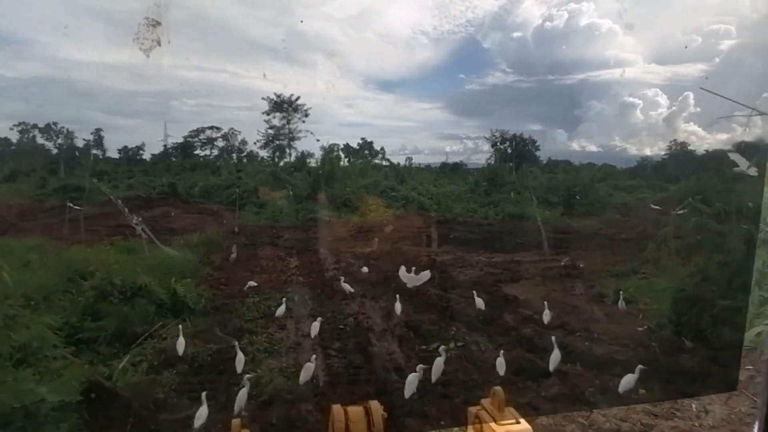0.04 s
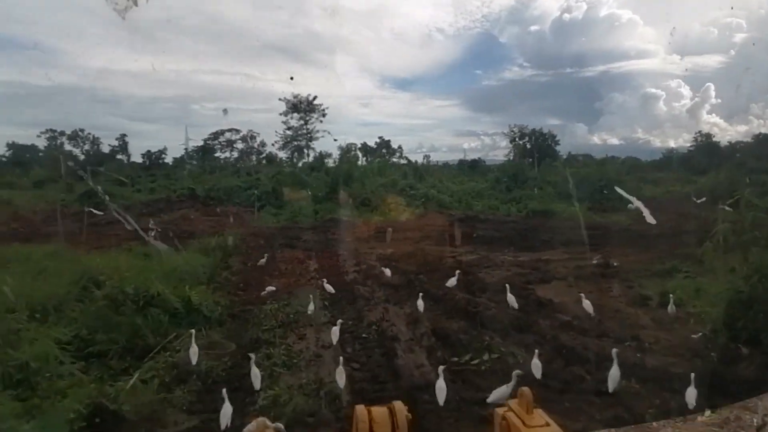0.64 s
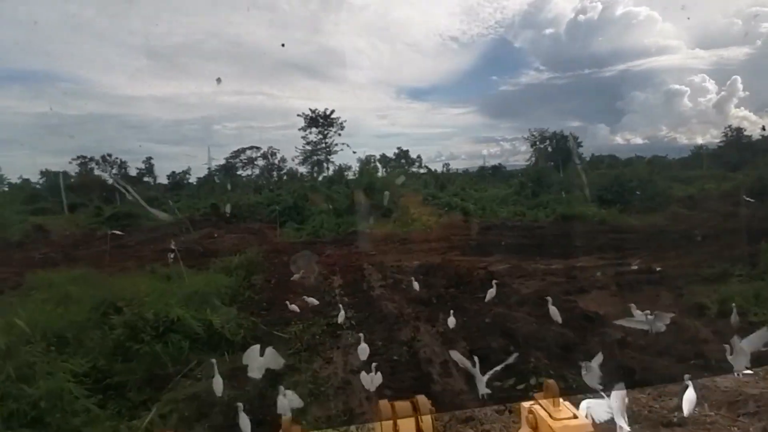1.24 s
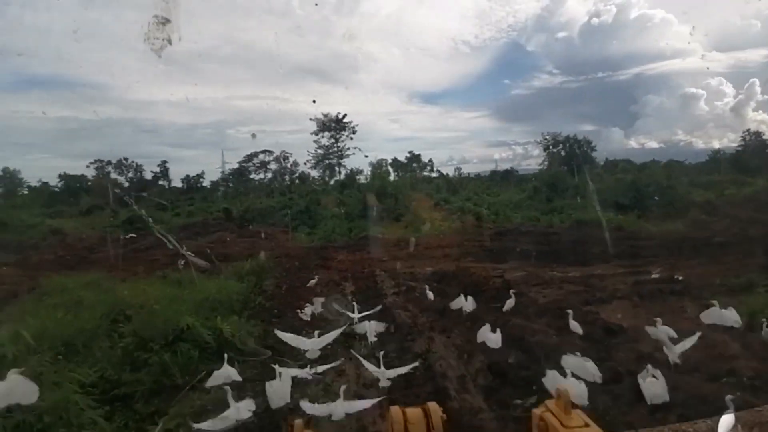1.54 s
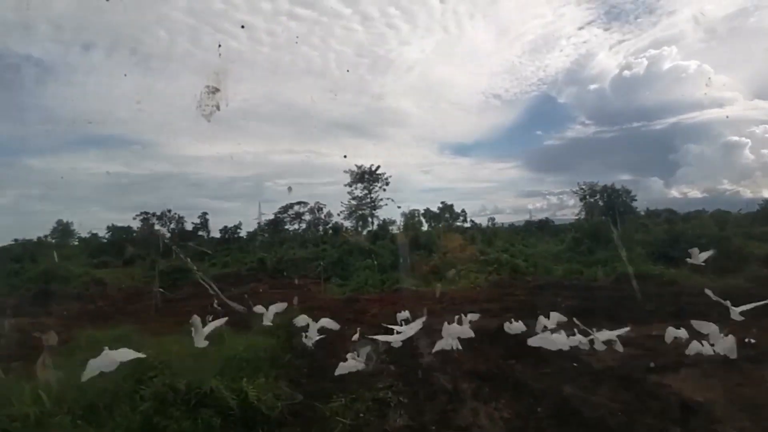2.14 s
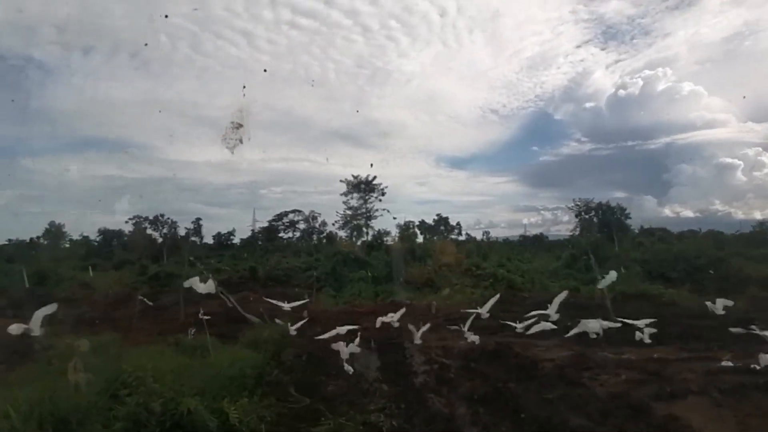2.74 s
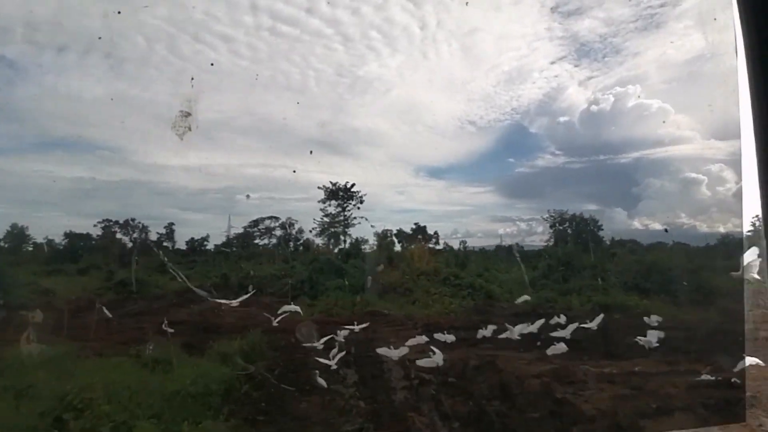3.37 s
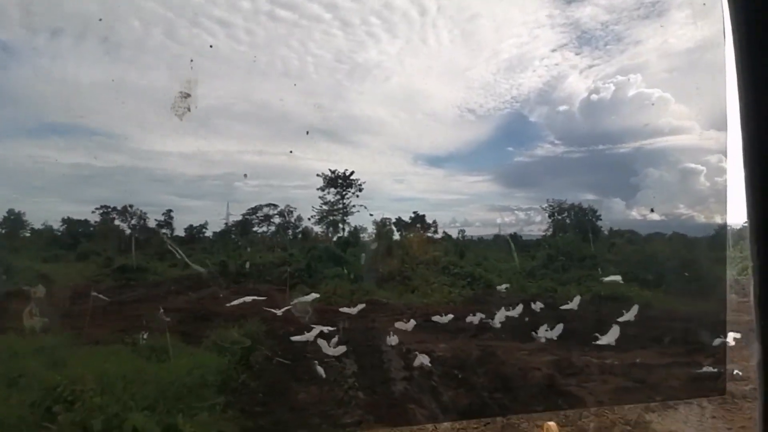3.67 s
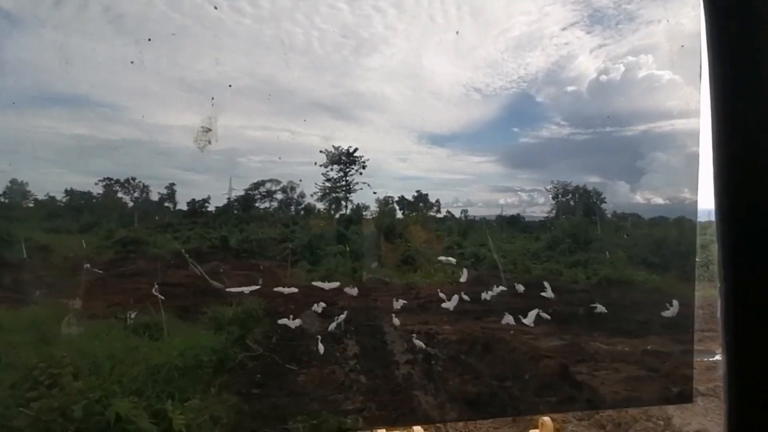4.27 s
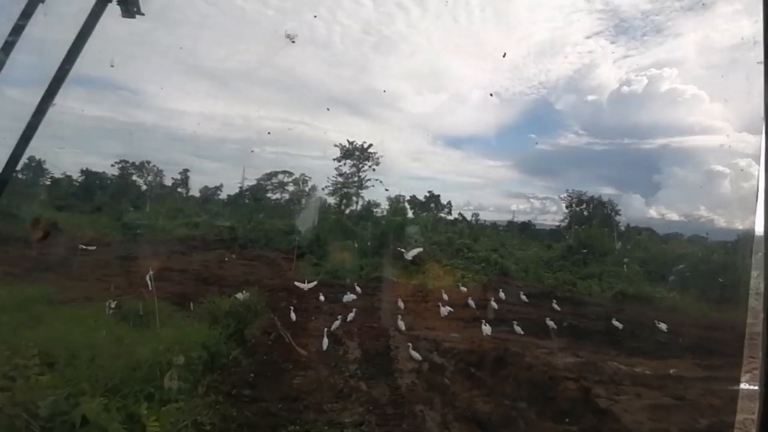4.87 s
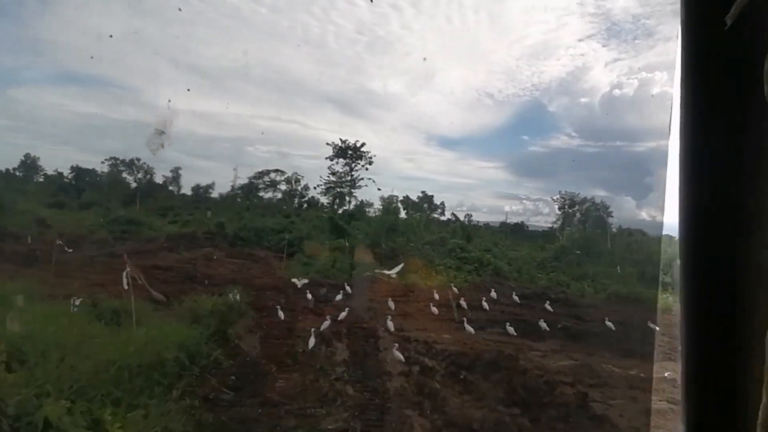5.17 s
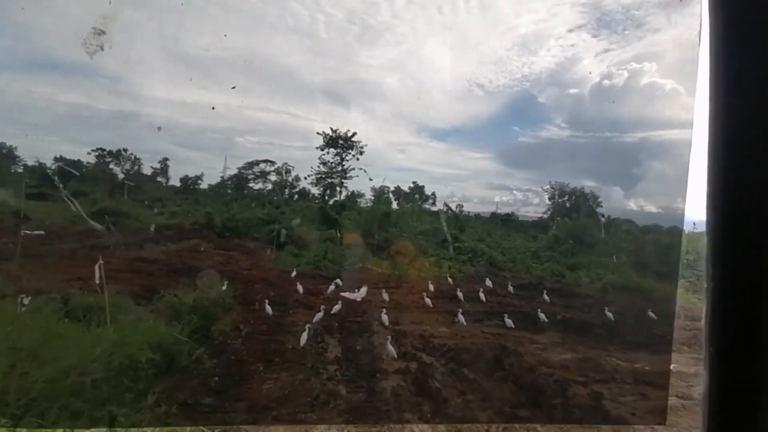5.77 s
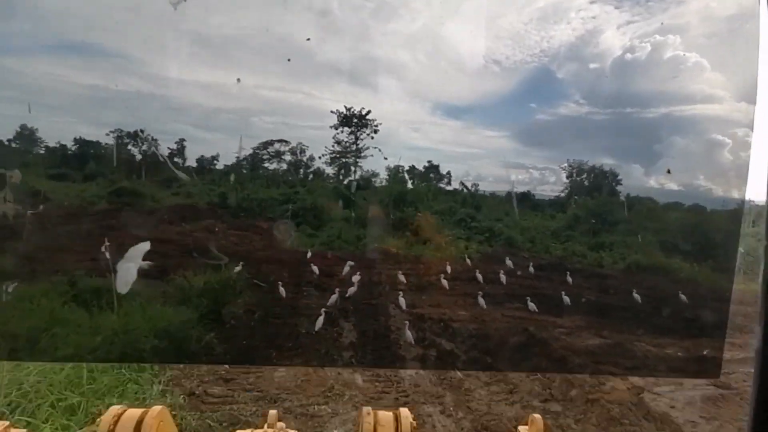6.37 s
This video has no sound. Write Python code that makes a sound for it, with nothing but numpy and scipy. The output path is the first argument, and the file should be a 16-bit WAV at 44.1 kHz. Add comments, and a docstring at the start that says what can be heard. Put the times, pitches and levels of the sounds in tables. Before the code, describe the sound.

A bulldozer's diesel engine booms steadily inside the cab, with rattling panels, a few dull knocks and a sharp squeak late on.

```python
"""A booming diesel din at nearly steady speed: a six-cylinder bulldozer, heard from inside the cab.
Firings throb, the block clatters harder under load, and fan, pump and gears sing over a fine hiss.
Loose panels buzz whenever an engine order meets their resonance; parts of the cab rattle and knock.
Late on, something close by squeaks and scrapes, and a gain control ducks the din."""
import sys
import numpy as np
from scipy.fft import rfft, irfft, next_fast_len
from scipy.io import wavfile
from scipy.ndimage import uniform_filter1d, minimum_filter1d, map_coordinates

SR = 44100
rng = np.random.default_rng(int(sys.argv[2]) if len(sys.argv) > 2 else 0)


def wav_record(signal):
    """Record a signal, one row per channel, as 16-bit PCM in the file named by sys.argv[1]."""
    frames = np.transpose(np.atleast_2d(signal))
    bounded = np.clip(frames, -1, 1)
    # unit amplitude maps onto the largest positive 16-bit level
    quanta = np.round(bounded * 32767).astype(np.int16)
    wavfile.write(sys.argv[1], SR, quanta)


N = 287091

CYLINDERS = 6  # firings per four-stroke cycle; an order is a multiple of the cycle rate
# low din: time_s, throb_db, boom_db
LOW_DIN_LEVELS = [(0, -23.5, -36), (.75, -21.5, -34.5), (1.2, -23, -34.5), (2.3, -23, -30.5),
                  (3.3, -24.5, -34), (5.1, -24, -38), (5.8, -24, -37), (6.5, -25.5, -33.5)]
# gear train: time_s, whine_db, housing_db
GEAR_LEVELS = [(0, -44, -35), (1.1, -44.5, -36), (1.45, -41, -36.5), (2.5, -39, -35.3), (3.1, -45, -39),
               (3.75, -41.5, -38), (4.0, -52, -37.5), (5.1, -57.5, -36.5), (6.5, -57, -40)]


def amp(db):
    """Decibels to gain."""
    return 10 ** (np.asarray(db) / 20)


def unit(x):
    """Scale to rms 1."""
    return x / np.sqrt(np.mean(x ** 2) + 1e-20)


def curves(rows):
    """One value per sample for each column after time_s."""
    time_s, *columns = np.transpose(rows)
    return [np.interp(np.arange(N) / SR, time_s, column) for column in columns]


def wobble(rate_hz):
    """Smooth random curve, rate_hz knots a second."""
    knots = rng.standard_normal(int(N * rate_hz / SR) + 4)
    steps = np.linspace(0, N * rate_hz / SR, N // 32)
    curve = map_coordinates(knots, [steps], mode="mirror")
    return np.interp(np.arange(N) * rate_hz / SR, steps, curve)


def filtered(x, response):
    """Zero-phase filter with gain response(hz)."""
    size = next_fast_len(N + SR // 2)
    return irfft(rfft(x, size) * response(np.fft.rfftfreq(size, 1 / SR)), size)[:N]


def coloured(x, colour):
    """x through a body with (freq_hz, gain_db) points, at rms 1."""
    hz, db = np.transpose(colour)
    response = lambda f: amp(np.interp(np.log(f + 1), np.log(hz), db, left=-60, right=-80))
    return unit(filtered(x, response))


def partial(firings, multiple, waver_db, drift_rad):
    """Slightly unsteady sine at a multiple of the firing rate, at rms 1."""
    phase = 2 * np.pi * (multiple * firings + rng.random()) + drift_rad * wobble(9)
    return unit(amp(waver_db * wobble(12)) * np.sin(phase))


def blows(firings, decay_firings, uneven_db, scatter_db):
    """Envelope of one dying blow per firing; each cylinder has its own strength."""
    index = firings.astype(int)
    cylinder_db = uneven_db * unit(rng.standard_normal(CYLINDERS))[index % CYLINDERS]
    strength_db = cylinder_db + scatter_db * rng.standard_normal(1024)[index]
    return unit(amp(strength_db) * np.exp(-(firings % 1) / decay_firings))


def pulsed_noise(firings, envelope, pulsed, repeat):
    """Noise with one share of its power pulsed by envelope and one repeating every cycle."""
    pattern = rng.standard_normal(4096)
    cycle = map_coordinates(pattern, [firings / CYLINDERS % 1 * len(pattern)], mode="grid-wrap")
    noise = np.sqrt(repeat) * unit(cycle) + np.sqrt(1 - repeat) * rng.standard_normal(N)
    return noise * np.sqrt(1 - pulsed + pulsed * envelope ** 2)


def band(centre_hz, width_hz):
    """Noise in one resonance, at rms 1."""
    response = lambda hz: 1 / (1 + ((hz - centre_hz) / (.7 * width_hz)) ** 4)
    return unit(filtered(rng.standard_normal(N), response))


def swell(start_s, length_s):
    """Half-sine envelope."""
    return np.sin(np.pi * np.clip((np.arange(N) / SR - start_s) / length_s, 0, 1))


def stroke(t, length_s, ramp_s, fade_db):
    """Envelope of one rub: quick rise, slow fade, quick end."""
    ramps = np.clip(np.minimum(t, length_s - t) / ramp_s, 0, 1)
    return ramps * amp(-fade_db * np.clip(t / length_s, 0, 1))


def hits(rows, colour, t60_s):
    """Sudden, decaying bursts of coloured noise."""
    t = np.arange(N) / SR
    envelope = sum((t >= start_s) * amp(db - 60 * np.abs(t - start_s) / t60_s) for start_s, db in rows)
    return envelope * coloured(rng.standard_normal(N), colour)


def exhaust(firings):
    """Firing tone, orders of unequal cylinders, and fan and pump beating with them over a rumble."""
    # firing tone: time_s, level_db
    tone_levels = [(0, -18), (.95, -19.5), (1.12, -21), (2.4, -25.5), (2.7, -21), (2.85, -23.5),
                   (3.6, -20.5), (4, -24), (5.1, -19.5), (5.9, -23), (6.45, -18.5)]
    # third harmonic of the firing tone: time_s, boost_db
    third_boosts = [(0, -4), (.38, -13), (.72, 6), (1.1, 0.5), (2.5, 1), (5.2, -0.5), (5.6, -7), (5.85, 2),
                    (6.5, 2)]
    # exhaust partials: order, gain_db
    exhaust_orders = [(7, -17.5), (8, -19), (9, -10.5), (10, -8.5), (11, -14), (12, -3.5), (13, -16.5),
                      (15, -23), (18, -15), (20, -28.5), (21, -30), (22, -28.5), (24, -20), (26, -27.5),
                      (27, -27.5)]
    # fan and pump partials: firing_multiple, gain_db
    fan_partials = [(1.708, -7.8), (3.417, -25.5), (3.91, -16.5), (5.125, -27.5), (7.82, -23.5)]
    # rumble spectrum: freq_hz, gain_db
    rumble_colour = [(15, -18), (25, -9), (32, -18.5), (45, -8), (57, 2.5), (80, -2), (100, -6.5),
                     (125, -7), (155, -6), (200, -16), (300, -43.5)]
    tone_db, = curves(tone_levels)
    third_db, = curves(third_boosts)
    throb_db, _ = curves(LOW_DIN_LEVELS)
    tone = amp(tone_db) * partial(firings, 1, waver_db=.76, drift_rad=.07)
    orders = np.zeros(N)
    for order, db in exhaust_orders:
        gain = amp(db + third_db * (order == 3 * CYLINDERS))
        orders += gain * partial(firings, order / CYLINDERS, waver_db=1, drift_rad=.08)
    fan = sum(amp(db) * partial(firings, multiple, waver_db=.8, drift_rad=.1)
              for multiple, db in fan_partials)
    rumble = amp(-8.2) * coloured(rng.standard_normal(N), rumble_colour)
    return tone + amp(throb_db) * (orders + fan + rumble)


def clatter(firings, effort_db):
    """Each firing booms in the cab, shakes its panels and the gear housing, and raps the block."""
    # cab boom: freq_hz, gain_db
    boom_colour = [(110, -12), (160, -2.5), (190, 3), (225, -6.5), (255, -5), (305, -3.5), (360, -14),
                   (500, -28.5)]
    # cab panels: freq_hz, gain_db
    panel_colour = [(260, -23), (370, -8), (450, 2), (495, -1), (540, 1), (600, -0.5), (720, -3.5),
                    (820, -4.5), (1000, -15.5), (1500, -32.5)]
    # gear housing: freq_hz, gain_db
    housing_colour = [(650, -26.5), (810, -2.5), (870, 0.5), (950, -1), (1010, -3), (1110, -4.5),
                      (1300, -14), (1800, -35.5)]
    # engine block: freq_hz, gain_db
    block_colour = [(800, -15), (1150, 1), (1320, -.5), (1420, 0), (1550, -0.5), (1750, 0), (1970, -1),
                    (2150, -3), (2380, -1), (2550, -3), (2720, -5), (3300, -7), (3800, -21), (5000, -31.5)]
    _, boom_db = curves(LOW_DIN_LEVELS)
    _, housing_db = curves(GEAR_LEVELS)
    panel_db = -34 + 1.2 * effort_db
    block_db = -35.5 + .89 * effort_db
    thuds = blows(firings, decay_firings=1, uneven_db=-.5, scatter_db=1.5)
    raps = blows(firings, decay_firings=1, uneven_db=.5, scatter_db=3)
    boom = coloured(pulsed_noise(firings, thuds, pulsed=.57, repeat=.2), boom_colour)
    panels = coloured(pulsed_noise(firings, thuds, pulsed=.3, repeat=.25), panel_colour)
    housing = coloured(pulsed_noise(firings, thuds, pulsed=.66, repeat=.75), housing_colour)
    block = coloured(pulsed_noise(firings, raps, pulsed=.14, repeat=.44), block_colour)
    return (amp(boom_db) * boom + amp(housing_db) * housing
            + amp(panel_db) * panels + amp(block_db) * block)


def gears(firings):
    """Gear meshes whine in step with the crankshaft and flutter with their backlash."""
    # gear meshes: firing_multiple, gain_db
    mesh_partials = [(13.67, 0), (15.5, -13), (22.27, -14), (27.35, -14), (29, -15)]
    whine_db, _ = curves(GEAR_LEVELS)
    meshes = sum(amp(db) * partial(firings, multiple, waver_db=2.2, drift_rad=.32)
                 for multiple, db in mesh_partials)
    flutter = unit(1 + .45 * wobble(110))
    return amp(whine_db) * flutter * meshes


def squeaks():
    """Stick-slip: gliding tones that judder with each slip, edged with a wider rasp."""
    # squeaks: start_s, length_s, start_hz, end_hz, level_db, width_hz, noise_share
    rubs = [(3.975, 0.05, 7000, 6850, -34, 160, .6), (4.435, .055, 7560, 7540, -42, 200, .8),
            (4.975, 0.105, 4050, 4500, -38.5, 700, 0.95), (5.286, .036, 4790, 4730, -25.5, 250, 0.3),
            (5.303, 0.058, 5650, 5610, -12, 180, .12), (5.34, 0.06, 4850, 4870, -24.5, 220, .35),
            (5.348, 0.054, 5520, 5510, -22, 180, .25), (5.364, 0.03, 4250, 4000, -30, 454, .9),
            (5.39, 0.046, 3430, 3400, -25.5, 350, 0.35), (5.402, 0.02, 7200, 7250, -19, 150, 0.2),
            (5.7, 0.06, 7580, 7600, -41, 250, 0.9), (6.37, .06, 7540, 7540, -43, 200, .8)]
    slip_hz, slip_scatter, slip_depth = 88, .12, .58
    rasp_width_hz, rasp_db = 750, -14
    out = np.zeros(N)
    for start_s, length_s, start_hz, end_hz, db, width_hz, noise_share in rubs:
        t = np.arange(int(length_s * SR)) / SR
        phase = 2 * np.pi * np.cumsum(np.linspace(start_hz, end_hz, len(t))) / SR
        jitter = lambda hz: map_coordinates(rng.standard_normal(256), [t * hz], mode="mirror")
        smear = lambda hz: unit(jitter(hz) * np.sin(phase) + jitter(hz) * np.cos(phase))
        slips = np.cumsum(slip_hz * (1 + slip_scatter * jitter(slip_hz))) / SR
        judder = 1 - slip_depth * np.cos(2 * np.pi * slips)
        tone = np.sqrt(1 - noise_share) * np.sin(phase) + np.sqrt(noise_share) * smear(width_hz)
        rasp = amp(rasp_db) * smear(rasp_width_hz)
        envelope = amp(db) * stroke(t, length_s, ramp_s=.015, fade_db=5)
        out[round(start_s * SR):][:len(t)] += envelope * unit(judder * tone + rasp)
    return out


def scrapes():
    """Dry rubs: strokes of bright, grainy noise."""
    # scrapes: start_s, length_s, level_db
    rubs = [(5.345, 0.061, -27.5), (5.387, 0.11, -21.5), (5.528, 0.14, -33)]
    # friction spectrum: freq_hz, gain_db
    scrape_colour = [(1200, -14), (2100, -9), (2900, 0.5), (4200, -9), (5600, 2.5), (6700, 4), (7500, -3.5)]
    t = np.arange(N) / SR
    envelope = sum(amp(db) * stroke(t - start_s, length_s, ramp_s=.021, fade_db=8.5)
                   for start_s, length_s, db in rubs)
    grain = rng.standard_normal(N) * amp(1.4 * wobble(400))
    return envelope * coloured(grain, scrape_colour)


def buzzes(firings, firing_hz):
    """Each loose panel buzzes as an engine order drifts through its resonance."""
    # loose panels: order, resonance_hz, level_db
    loose_panels = [(16, 184, -38.5), (39, 463, -46), (40, 461, -43), (47, 538, -44.5), (69, 822, -47),
                    (75, 895, -46), (78, 904, -44)]
    panel_q = 110
    out = np.zeros(N)
    for order, resonance_hz, db in loose_panels:
        multiple = order / CYLINDERS
        detuning = 2 * panel_q * (multiple * firing_hz / resonance_hz - 1)
        gain = amp(db) / np.sqrt(1 + detuning ** 2)
        out += gain * partial(firings, multiple, waver_db=4, drift_rad=1.1)
    return out


def ringing(firings):
    """Single engine orders swell and fade in the cab."""
    # ringing orders: start_s, length_s, order, level_db
    spells = [(0.096, 0.52, 24, -39), (.45, .95, 75, -44.5), (1.347, 1.3, 24, -36.5), (1.3, 0.89, 112, -49),
              (1.6, .8, 134, -49), (1.6, 1.5, 126, -47), (1.8, 1.5, 164, -49.5), (1.8, 0.62, 16, -32),
              (2.703, 1.8, 115, -48), (2.597, 1.3, 75, -46), (2.902, 1.3, 175, -51), (5.5, 1.2, 60, -42.5),
              (5.6, 1.3, 75, -45.5)]
    out = np.zeros(N)
    for start_s, length_s, order, db in spells:
        tone = partial(firings, order / CYLINDERS, waver_db=2.5, drift_rad=.5)
        out += amp(db) * swell(start_s, length_s) * tone
    return out


def rattles(firings):
    """Cab parts rattle for a while in time with the firings."""
    # rattles: start_s, length_s, resonance_hz, width_hz, level_db
    spells = [(-.6, 2.1, 905, 120, -41.5), (-.5, 1.2, 400, 120, -40.5), (1.2, 1.63, 265, 90, -36.5),
              (2.3, 1.85, 815, 169, -38), (3.9, 0.92, 450, 71.3, -41), (4.0, 0.75, 643, 129, -41),
              (2.6, 1.9, 1960, 180, -45), (4.202, 0.82, 2270, 705, -41), (5.3, 1.4, 704, 90, -43),
              (5.5, 1.6, 876, 90, -43), (5.5, 1.4, 450, 80, -44)]
    shaking = blows(firings, decay_firings=.7, uneven_db=2, scatter_db=2)
    return shaking * sum(amp(db) * swell(start_s, length_s) * band(resonance_hz, width_hz)
                         for start_s, length_s, resonance_hz, width_hz, db in spells)


def knocks():
    """Cab parts knock dully through the clatter."""
    # knocks: start_s, level_db
    strikes = [(2.909, -27), (2.938, -28), (2.984, -31), (3.009, -26), (3.259, -25), (3.329, -34),
               (3.884, -28), (4.167, -28)]
    # knock spectrum: freq_hz, gain_db
    knock_colour = [(300, -19), (500, 8.5), (1000, 2), (1500, -5), (3000, -11), (4500, -29)]
    return hits(strikes, knock_colour, t60_s=.053)


def ticks():
    """Loose fittings tick lightly."""
    # ticks: start_s, level_db
    strikes = [(.275, -37), (1.345, -34), (1.463, -31), (1.476, -35)]
    # tick spectrum: freq_hz, gain_db
    tick_colour = [(2000, -16), (3800, 0), (5000, 0), (7200, 0)]
    return hits(strikes, tick_colour, t60_s=.03)


def hiss(firings, effort_db):
    """Fine hiss that grows with effort and flutters with the firings."""
    # hiss spectrum: freq_hz, gain_db
    hiss_colour = [(2120, -29), (3600, -4.5), (3990, -5.5), (5310, 0.5), (6100, -3.5), (6780, 0.5),
                   (7210, -3.5), (7530, -15.5), (9790, -45)]
    flutter = blows(firings, decay_firings=.9, uneven_db=2, scatter_db=2)
    noise = pulsed_noise(firings, flutter, pulsed=.24, repeat=.042)
    return amp(-40 + 1.4 * effort_db) * coloured(noise, hiss_colour)


def gain_control(x):
    """Loud treble turns everything down; the gain holds briefly, then creeps back."""
    sense_hz, threshold_db, knee_db = 3500, -33.5, 10
    max_duck_db, hold_s, recover_db_per_s = 8, .045, 34
    treble = filtered(x, lambda hz: 1 / np.sqrt(1 + (sense_hz / (hz + 1)) ** 16))
    treble_db = 10 * np.log10(np.abs(uniform_filter1d(treble ** 2, size=512)) + 1e-12)
    duck_db = max_duck_db * np.tanh(np.maximum(treble_db - threshold_db, 0) / knee_db)
    hold_samples = int(hold_s * SR)
    held_db = -minimum_filter1d(-duck_db, size=hold_samples, origin=(hold_samples - 1) // 2)
    recovery_db = recover_db_per_s * np.arange(N) / SR
    cut_db = np.maximum.accumulate(held_db + recovery_db) - recovery_db
    return x * amp(-uniform_filter1d(cut_db, size=1024))


def scene():
    """Engine, cab and rubs in mono; the whole engine follows one count of firings."""
    # engine speed: time_s, firing_hz
    speeds = [(0, 70.45), (.7, 70.4), (1.2, 70.1), (1.7, 69.6), (2.3, 68.85), (3, 68.8), (3.4, 68.55),
              (4, 68.85), (4.5, 69.1), (5, 69.6), (5.4, 70.55), (5.9, 71.6), (6.5, 71.7)]
    # engine load: time_s, effort_db
    efforts = [(0, -1), (1.6, -.5), (3.2, 0), (4.6, 0.75), (5.2, 0.7), (5.8, -2), (6.5, -2.5)]
    firing_hz, = curves(speeds)
    effort_db, = curves(efforts)
    governor_hunt = 1 + .000969 * wobble(7)
    firings = np.cumsum(firing_hz * governor_hunt) / SR
    engine = (exhaust(firings) + clatter(firings, effort_db) + gears(firings)
              + buzzes(firings, firing_hz) + ringing(firings) + hiss(firings, effort_db))
    cab = rattles(firings) + knocks() + ticks()
    return (engine + cab + squeaks() + scrapes())[None]


def record(dry):
    """Gain control, then a steep low-pass."""
    cutoff_hz = 7460
    return filtered(gain_control(dry[0]), lambda hz: 1 / np.sqrt(1 + (hz / cutoff_hz) ** 120))[None]


dry = scene()
out = record(dry)
wav_record(out)
```